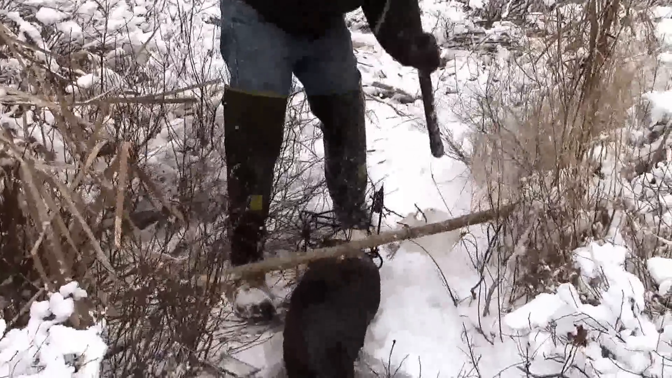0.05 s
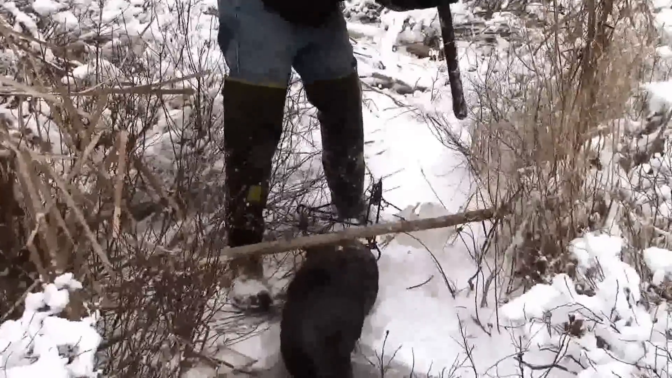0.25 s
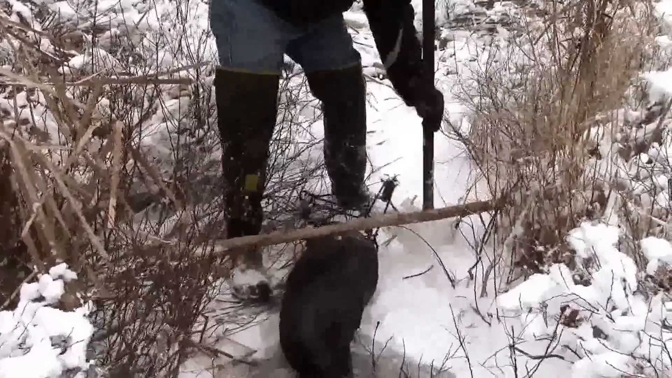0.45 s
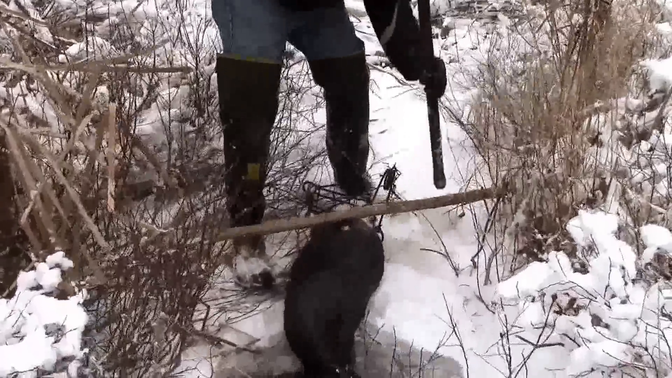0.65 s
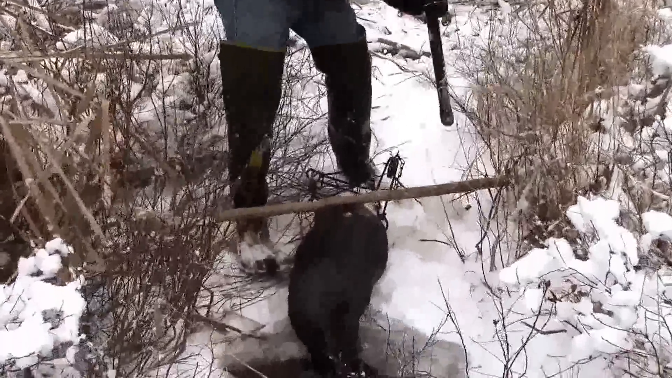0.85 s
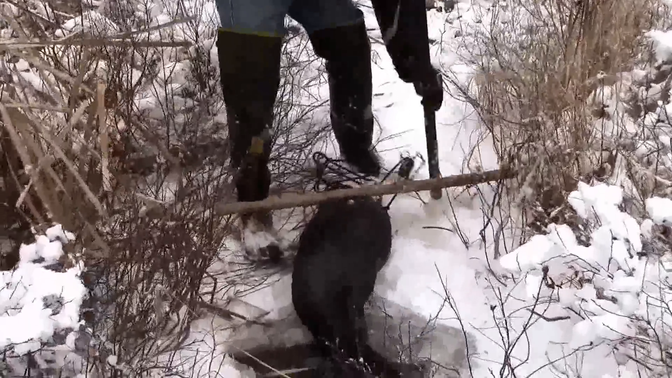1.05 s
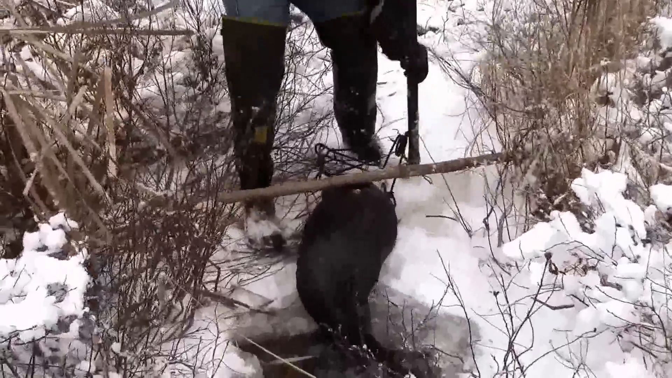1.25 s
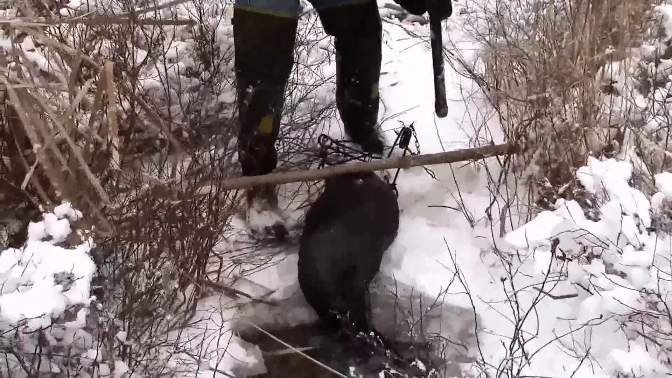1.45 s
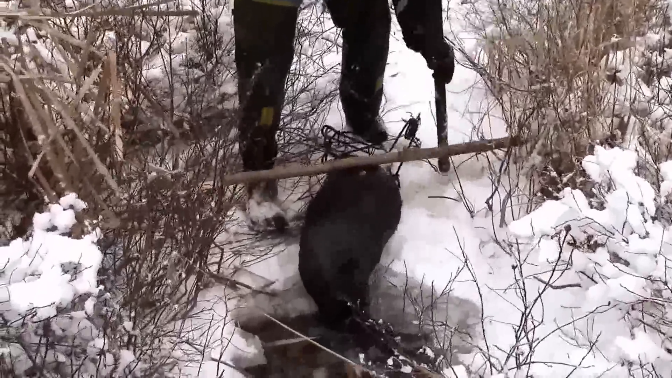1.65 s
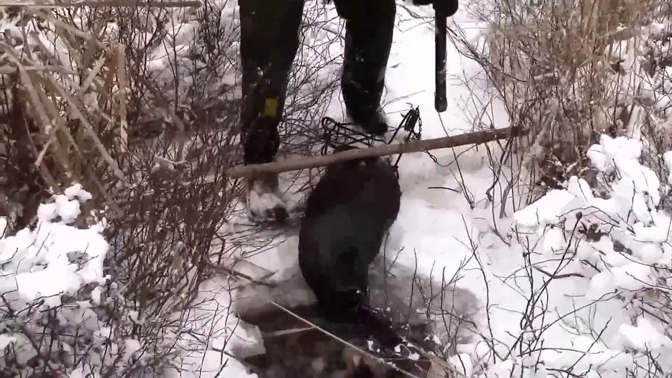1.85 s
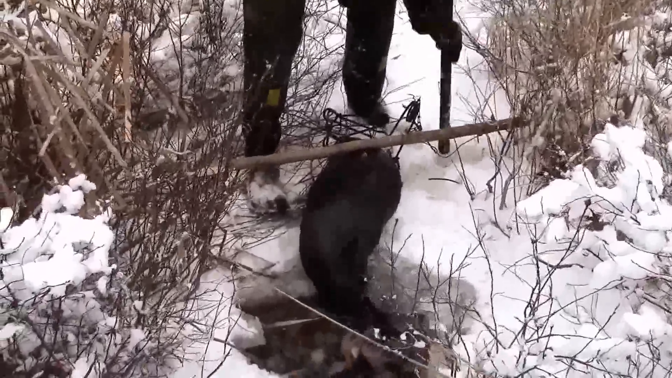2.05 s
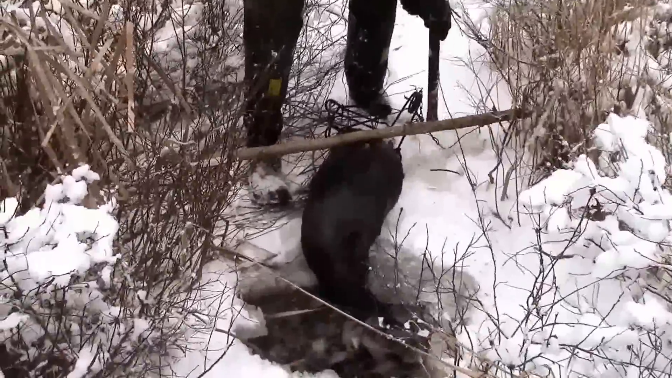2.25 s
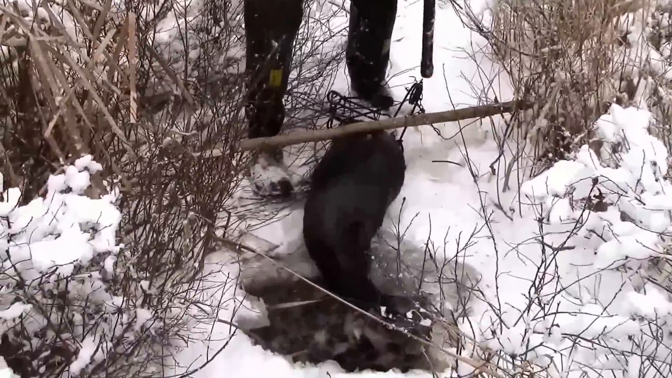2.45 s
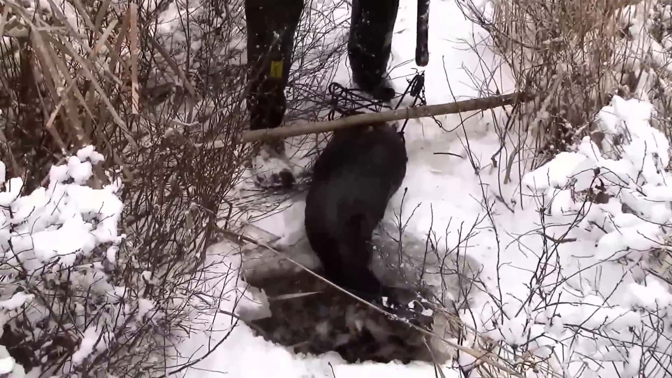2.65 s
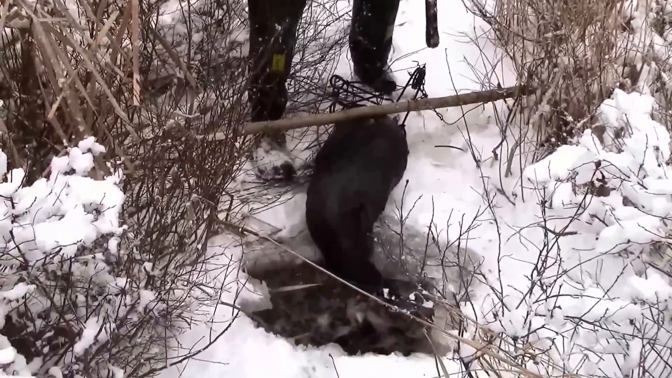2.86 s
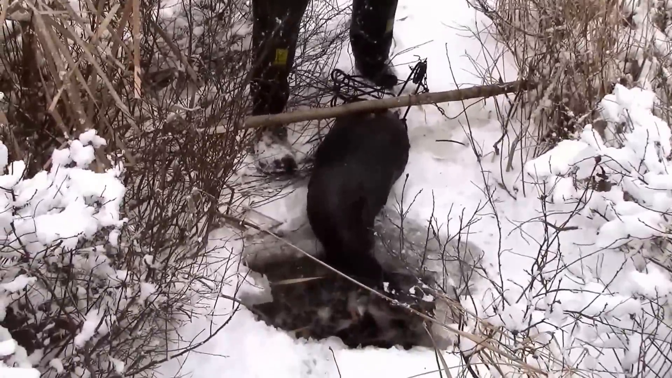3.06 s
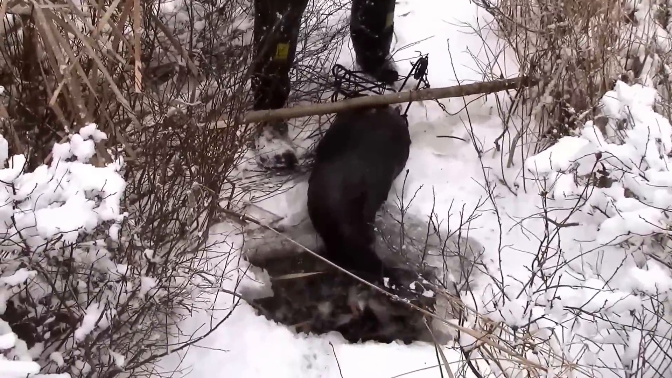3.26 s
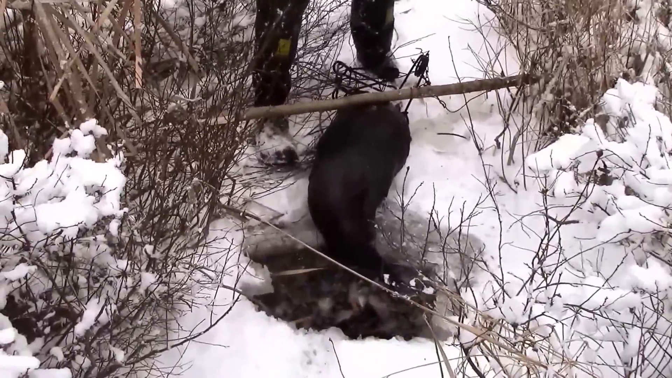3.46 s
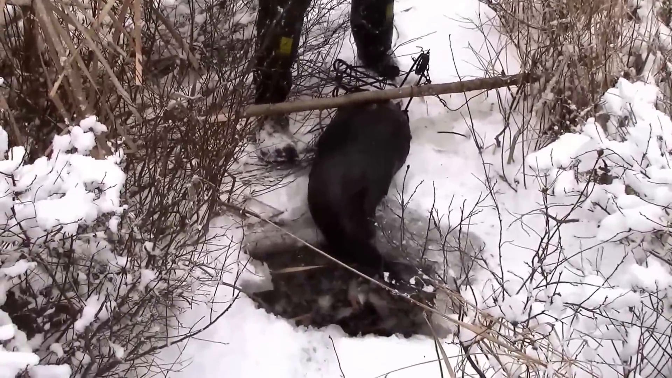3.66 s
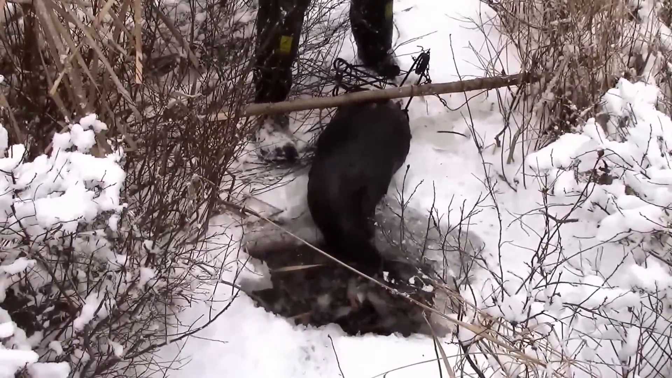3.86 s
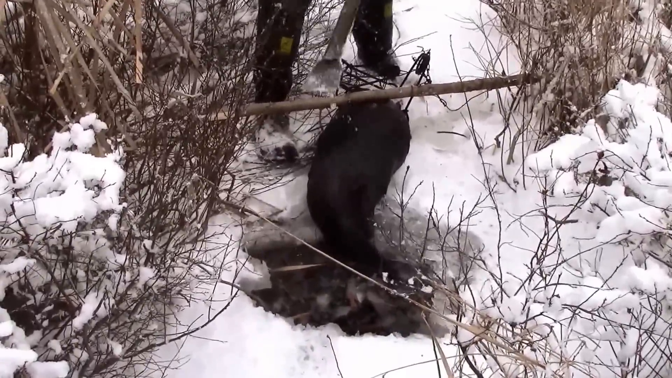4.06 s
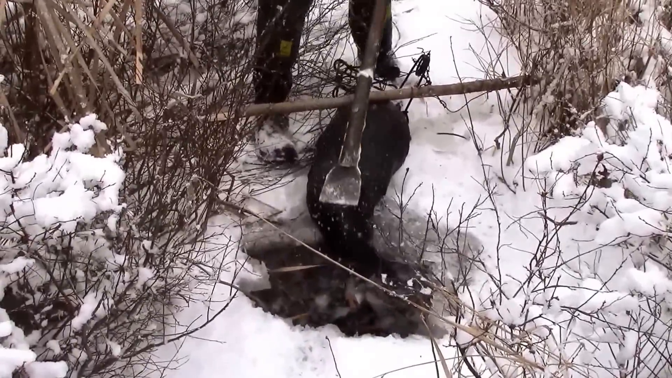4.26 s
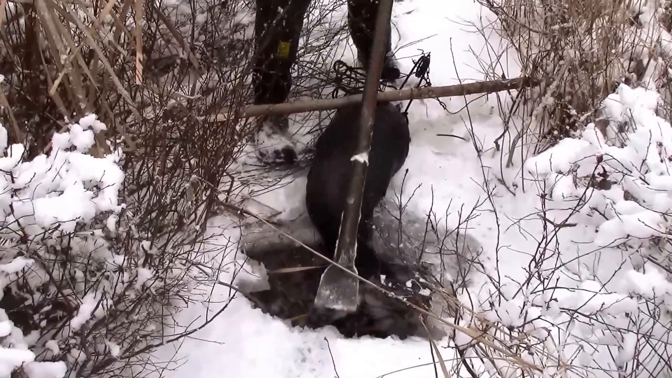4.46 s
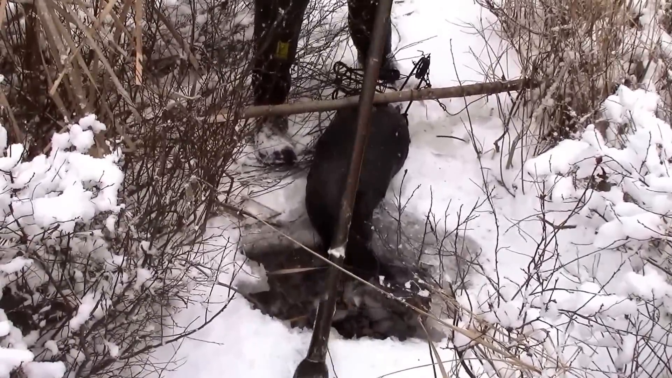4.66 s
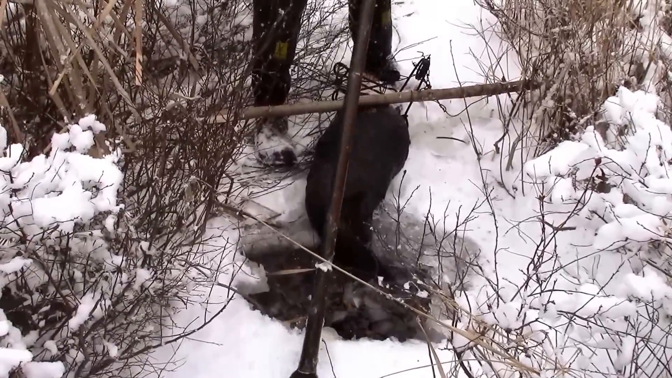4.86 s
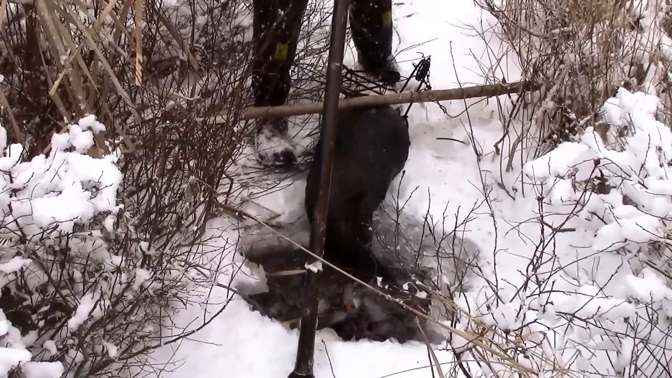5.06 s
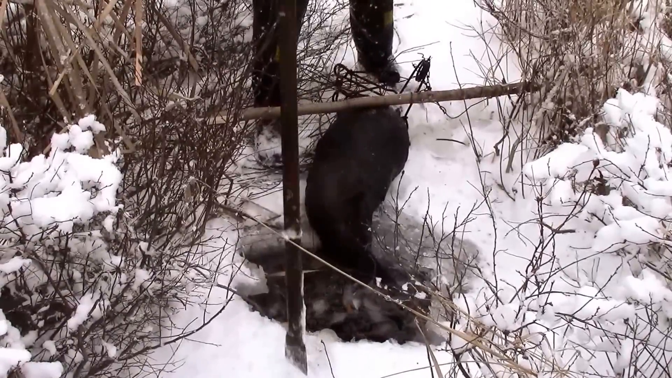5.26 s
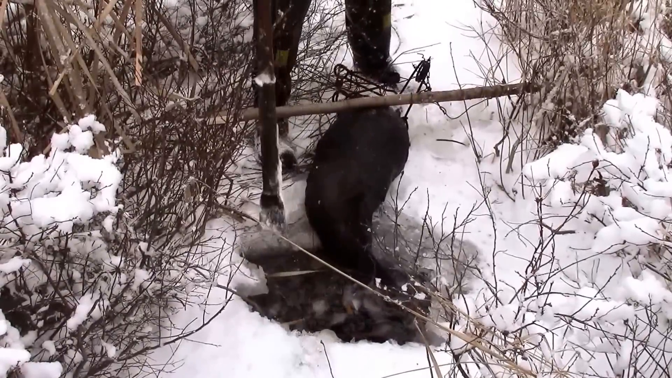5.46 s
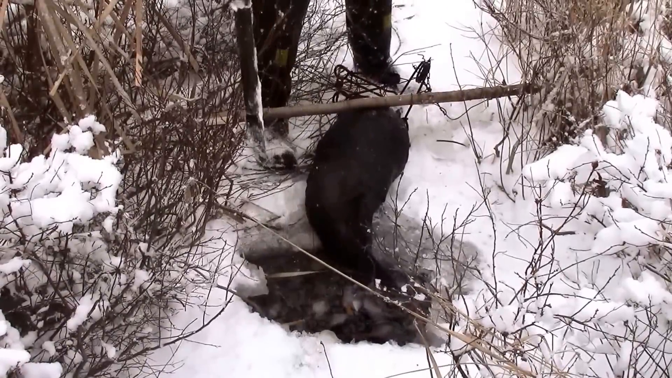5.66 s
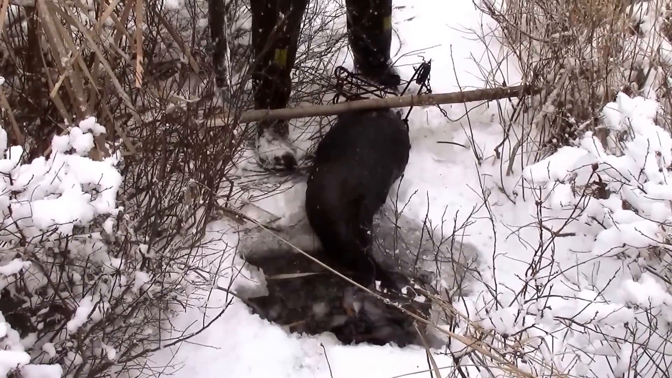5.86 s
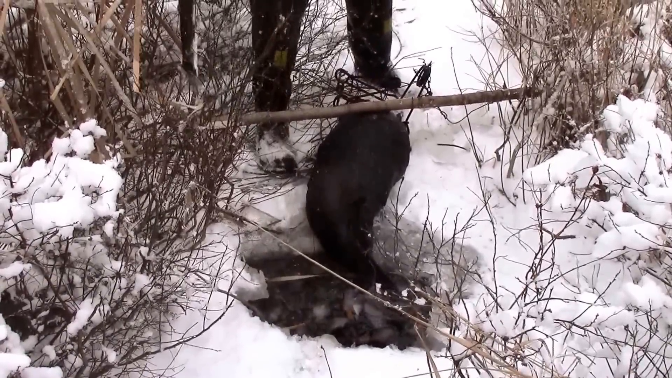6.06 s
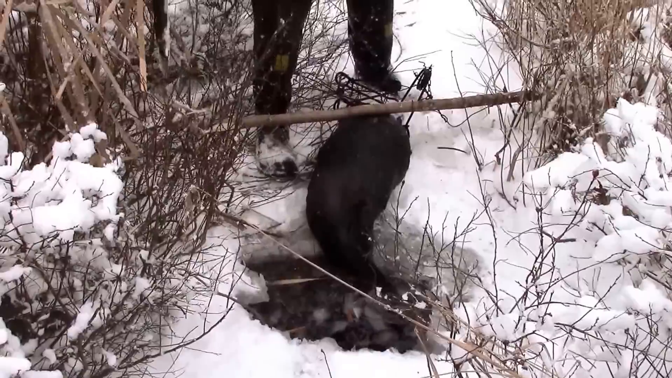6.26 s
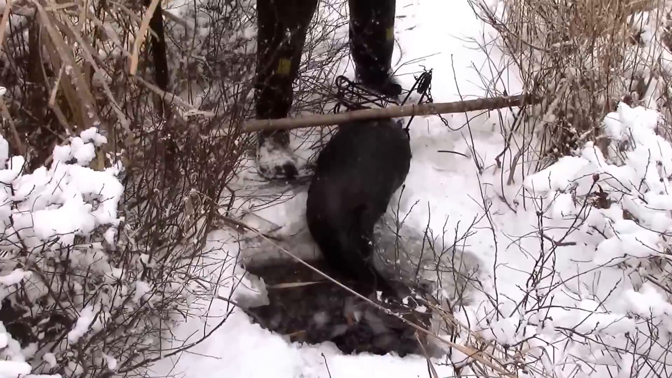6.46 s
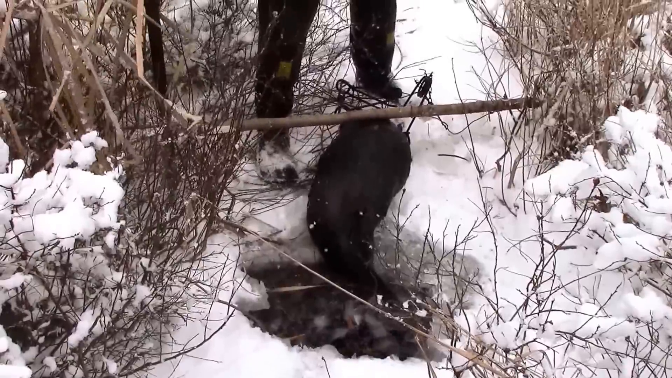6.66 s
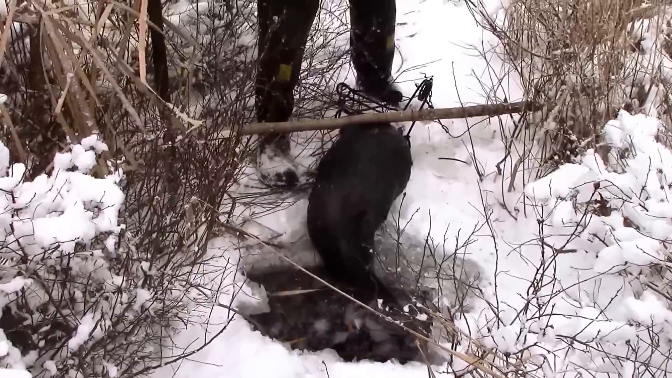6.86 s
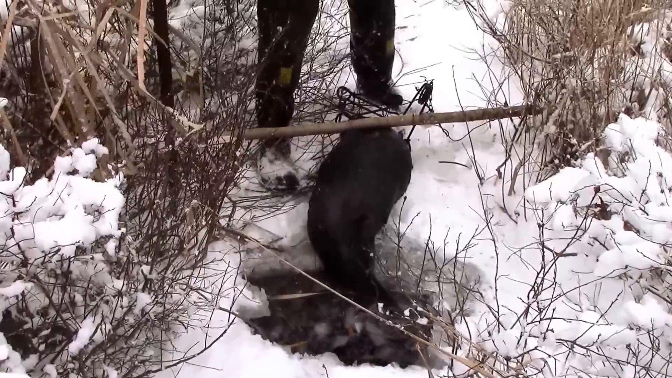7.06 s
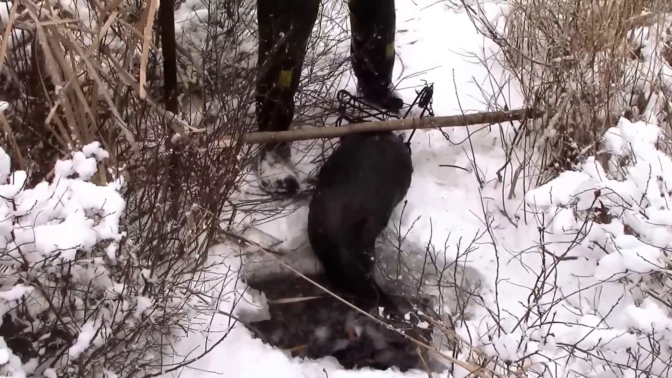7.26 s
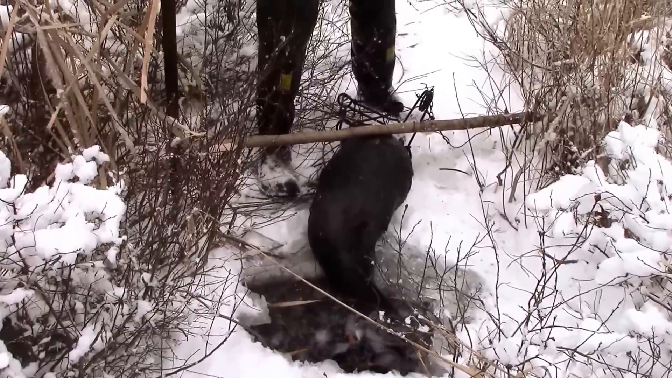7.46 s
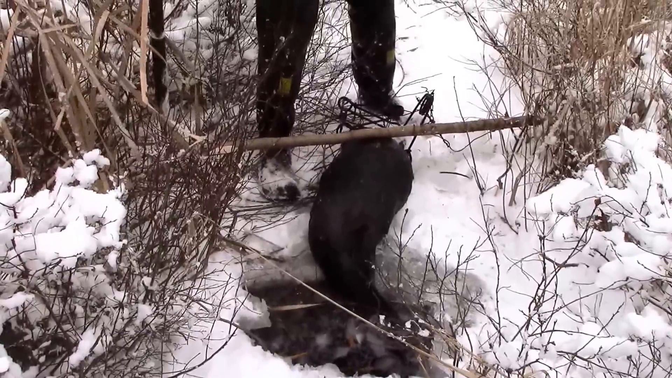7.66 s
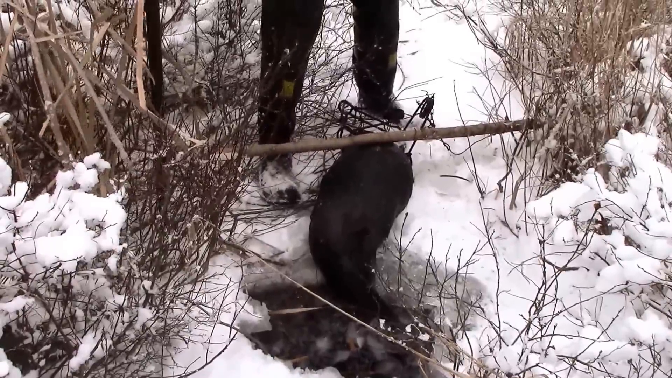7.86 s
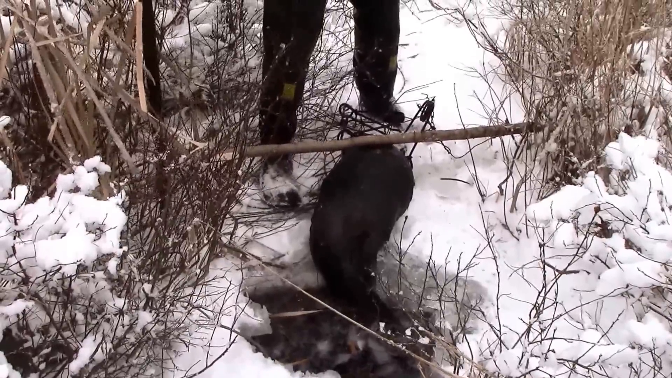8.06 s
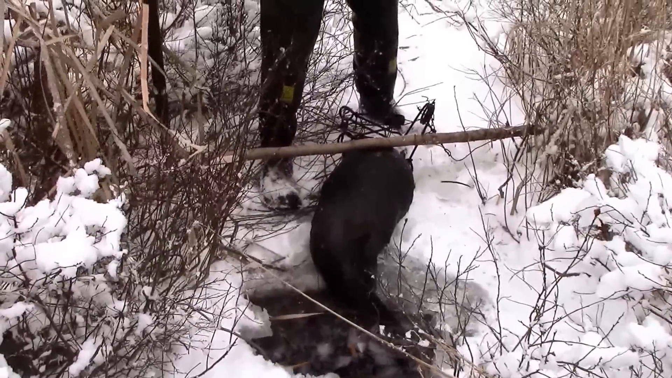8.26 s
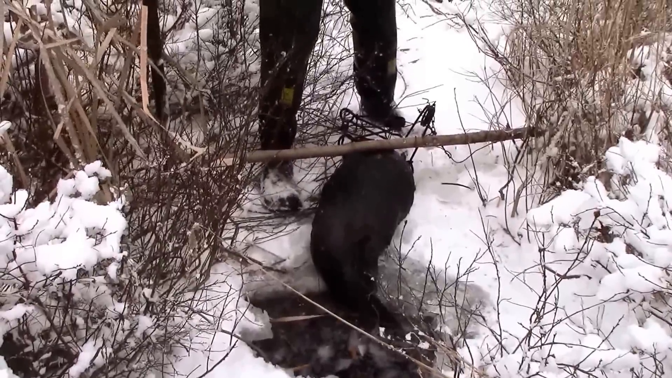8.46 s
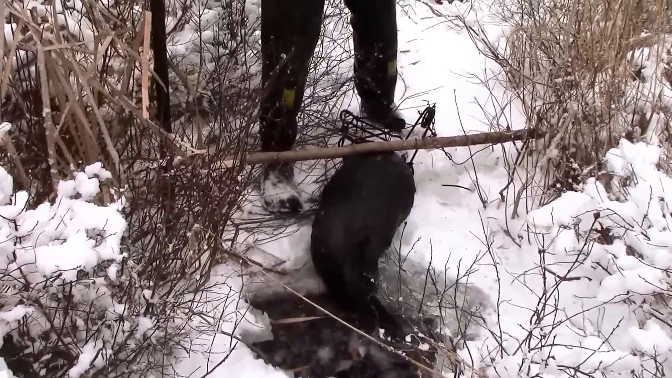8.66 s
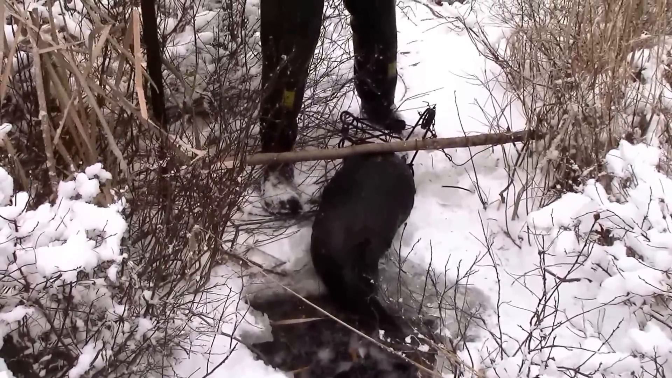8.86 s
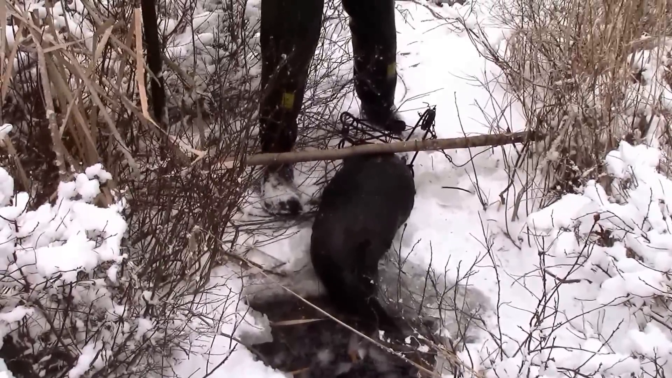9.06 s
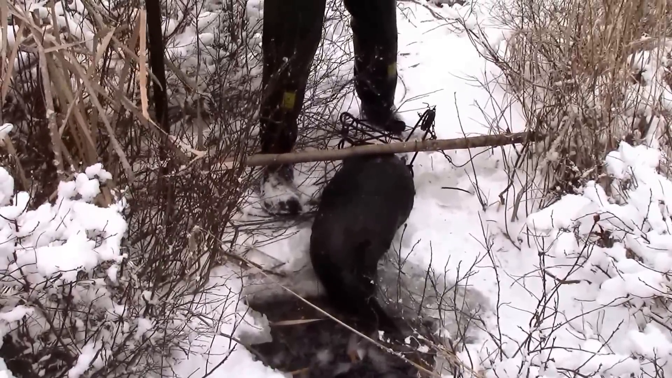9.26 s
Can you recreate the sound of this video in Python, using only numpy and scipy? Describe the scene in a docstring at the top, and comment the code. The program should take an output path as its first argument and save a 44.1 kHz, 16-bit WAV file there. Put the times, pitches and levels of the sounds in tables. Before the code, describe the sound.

A steel ice chisel strikes ice in widely spaced sharp, crunching blows, later ones cracking in quick snaps, with soft clothing rustle in snowy quiet.

```python
"""A steel ice chisel chops at the rim of a hole in a frozen pond, outdoors in snow: dense noise bursts
with a short steel ring. The first blows crush the ice; later ones split it in runs of fading snaps.
Crumbs fizz, the sheet heaves dully, chips tick and knock. Clothing, reeds and snow rustle as grainy
noise under slow swells; a thin squeak, a faint low hum and soft outdoor air complete the scene."""
import sys
import numpy as np
from scipy import signal
from scipy.fft import rfft, irfft
from scipy.io import wavfile
from scipy.ndimage import uniform_filter1d, minimum_filter1d

SR = 44100
rng = np.random.default_rng(int(sys.argv[2]) if len(sys.argv) > 2 else 0)


def persist_wave(psi):
    """Save psi, clipped to +-1, as 16-bit WAV."""
    counts = np.round(np.clip(psi, -1, 1) * 32767).astype(np.int16)
    wavfile.write(sys.argv[1], SR, np.atleast_2d(counts).T)


N = 411012
TIME = np.arange(N) / SR

# Still air. Each row: frequency in Hz, relative level in dB.
AIR_SPECTRUM = [(25, -1), (70, 1.5), (180, 3), (400, 1.5), (750, 3), (1500, -20), (3000, -0.5), (6000, -25),
                (9000, -25.5), (13000, -32.5), (16000, -26)]
# Murmur of the open land. Each row: time in seconds, level in dB.
MURMUR_LEVEL = [(0, -66), (2, -63.5), (3.3, -67), (4.3, -65), (5.3, -65), (5.7, -69), (7.3, -66.5),
                (9.3, -66)]
# Colour of the murmur. Each row: frequency in Hz, relative level in dB.
LAND_SPECTRUM = [(30, -24), (140, -22), (300, -6), (600, -2), (1100, -3.5), (2200, -6.5), (5000, -11),
                 (16000, -43.5)]

# Soft background stir of clothing, rising and falling. Each row: time in seconds, relative level in dB.
STIR_LEVEL = [(0, -59), (1.6, -57), (2.2, -66), (2.6, -69), (3.7, -89), (4.85, -56), (5.15, -75.5),
              (6.1, -65), (7.2, -59.5), (9.3, -66.5)]
# Sweeps of sleeve, reeds or blade; each mixes hiss with its own share of gritty body.
# Each row: peak time in seconds, relative level in dB, rise in seconds, fall in seconds,
# body against hiss in dB.
SWEEPS = [(.02, -48, 0.041, 0.078, -6.5), (.19, -46, 0.16, 0.068, -7), (2.33, -61, 0.14, 0.048, -9),
          (3.03, -65, .13, 0.22, -20), (3.27, -47.5, 0.081, 0.1, -16), (3.44, -52, 0.088, 0.11, -14),
          (3.63, -55, 0.094, 0.048, -19), (3.999, -42.5, 0.11, 0.19, -12), (4.58, -53, 0.78, 0.13, -9),
          (5.01, -51.5, 0.058, 0.066, -8), (5.22, -57.5, 0.058, 0.18, -4), (5.8, -52.5, 0.011, 0.027, -8),
          (5.9, -58, 0.08, 0.025, -11), (6.21, -45.5, 0.037, 0.1, -7), (6.46, -31, 0.099, 0.076, -8),
          (7.4, -55, 0.017, 0.0087, -1), (7.54, -49.5, 0.055, 0.17, -8.5), (7.73, -49, 0.1, .03, -8),
          (7.88, -39.5, 0.053, 0.13, -10), (7.935, -36.5, 0.012, 0.018, -11), (8.39, -50, 0.22, 0.063, -13),
          (8.56, -45.5, 0.048, 0.15, -8.5), (9.02, -50, 0.072, 0.051, -17), (9.21, -44.5, 0.054, 0.17, -14)]
SWELL_EXPONENT = 2.34  # 1 = pointed, 2 = rounded
# Fine debris falls after a blow. Each row: blow time in seconds, relative level in dB, T60 in seconds.
DEBRIS_SHOWERS = [(.497, -38, 1.4), (1.101, -40, 0.63), (1.622, -45.5, 0.77), (6.485, -43.5, 1.39),
                  (7.94, -48, 1.9), (8.628, -55.5, 5.7)]
SHOWER_FLIGHT_S, SHOWER_BODY_DB = 0.071, -9
# Hiss of the rustle. Each row: frequency in Hz, relative level in dB.
HISS_SPECTRUM = [(40, -46), (300, -30.5), (900, -22.5), (2000, -3.5), (3200, 2), (5000, -2.5), (7000, 1.5),
                 (9500, 0.5), (12000, -4.5), (14500, -14), (16000, -24.5)]
# Resonances of rubbing cloth. Each row: centre in Hz, width in Hz, height in dB.
CLOTH_RESONANCES = [(3060, 370, 0), (3600, 130, 2), (4750, 71, 0), (5970, 1400, 3), (8130, 810, 0),
                    (10600, 1600, 1.5)]
# Gritty body of the rustle. Each row: frequency in Hz, relative level in dB.
GRIT_SPECTRUM = [(40, -40), (250, -42), (600, -5.5), (1200, 0.5), (2200, 4), (3200, 1), (5000, -14.5),
                 (16000, -29.5)]

# Faint low hum. Each row: frequency in Hz, level in dB, peak time in seconds, fade in seconds.
HUM_PARTIALS = [(47, -82, .2, 0.54), (96.9, -76, .05, .4), (142, -77.5, .7, .6)]

# Snow yields as weight shifts. Each row: peak time in seconds, level in dB, half length in seconds.
SNOW_STEPS = [(.09, -57.5, 0.15), (0.323, -56, 0.032), (0.467, -54, 0.033), (.72, -59, 0.29),
              (1.045, -52.5, 0.034), (1.236, -58, 0.22), (1.66, -55.5, .14), (2.367, -60.5, 0.1),
              (4.6, -57.5, 0.096), (5.046, -63.5, 0.067), (6.196, -64, 0.065), (6.426, -53, 0.1),
              (7.903, -61, 0.037), (9.3, -59, 0.091)]
# Colour of yielding snow. Each row: frequency in Hz, relative level in dB.
SNOW_SPECTRUM = [(30, -40), (140, -22), (300, -4), (600, 1.5), (1100, 2.5), (2200, -5), (5000, -7.5),
                 (16000, -39.5)]

# Larger chips land, twigs tick. Each row: start in seconds, level in dB, centre in Hz.
CHIP_TICKS = [(0.0606, -43, 1700), (.111, -43.5, 6240), (.2185, -47, 2980), (0.5687, -25, 7700),
              (0.6242, -29, 2370), (1.2205, -32, 2150), (1.375, -44.5, 6300), (1.6966, -32.5, 1960),
              (1.7094, -36.5, 7100), (1.913, -48, 3000), (1.949, -48.5, 1820), (2.4693, -52, 2300),
              (2.7624, -55, 2920), (4.3697, -47, 7300), (6.138, -43.5, 6100), (6.315, -38, 7100),
              (6.8447, -43.5, 3000), (6.8936, -42.5, 6900), (7.0248, -44, 3020), (7.0893, -47.5, 3600),
              (8.2083, -40, 5700), (8.542, -42.5, 2650), (9.172, -41, 2380)]
# Loose ice knocks or clicks. Each row: centre time in seconds, peak in dB, pitch in Hz,
# decay length in seconds.
ICE_KNOCKS = [(0.4962, -26, 596, 0.0019), (1.013, -26.5, 606, 0.00039), (1.017, -20.5, 667, 0.00077),
              (1.6227, -20, 714, 0.0012), (1.646, -7.5, 810, 0.00059), (1.8494, -24.5, 724, 0.0009),
              (1.855, -47.5, 252, 0.0037), (2.607, -12, 2390, 0.00006), (5.277, -52, 203, 0.0043),
              (6.531, -23.5, 1410, 0.00039)]

# Cracks run in jumps. Each row: start in seconds, level in dB, number of jumps,
# mean gap in seconds.
CRACK_RUNS = [(.4965, -23.5, 1, 0), (0.52, -30, 1, 0), (1.622, -18.5, 1, 0), (2.1202, -23, 3, 0.013),
              (2.16, -29.5, 2, 0.017), (4.762, -36, 1, 0), (5.2305, -39, 1, 0), (6.483, -15, 1, 0),
              (6.4958, -15.5, 3, 0.0087), (7.948, -19, 10, 0.0091), (8.636, -18.5, 7, .0096),
              (9.269, -19, 7, 0.011)]
CRACK_FADE_DB = 15  # from the first jump to the end of a run
JUMP_JITTER_GAPS, JUMP_SPREAD_DB = .16, 2  # standard deviations
# Brittle snap. Each row: frequency in Hz, relative level in dB.
SNAP_SPECTRUM = [(50, -32), (300, -17), (900, 0), (1800, 1.5), (4300, 6.5), (5600, 2.5), (6600, -7),
                 (10500, -8.5), (13000, -16), (16000, -96)]
# Resonances of the ice sheet. Each row: centre in Hz, width in Hz, height in dB.
SHEET_RESONANCES = [(1260, 200, 4), (1740, 130, 4), (2250, 300, 4.5), (3270, 300, 2), (3900, 700, 2),
                    (4950, 400, 2)]

# Blade bites. Each row: peak time in seconds, level in dB, rise in seconds, T60 in seconds,
# bass shelf in dB, tilt in dB per octave, steel ring against the bite in dB.
BLADE_BLOWS = [(.4967, -17, .0012, 0.01, 9, -1, -15), (1.1008, -14.5, 0.0017, 0.04, -4.5, -1, -30),
               (1.6222, -13.5, 0.0013, 0.028, 7.5, 1.5, -25), (2.12, -13, 0.0021, 0.064, -4, -2, -7),
               (2.1582, -37.5, .004, 0.068, 3, -0.5, 8), (4.7656, -26, 0.0019, 0.049, 6, 0.5, -31),
               (5.23, -45, 0.0013, 0.018, 5, 1, 0), (6.485, -17.5, 0.0019, 0.04, -7, -.5, -2.5),
               (7.94, -10, 0.0013, 0.043, -2, .5, -18), (8.6283, -12, 0.0022, 0.028, 3.5, -.5, -26),
               (9.2506, -17.5, 0.0031, 0.05, -12.5, -3.5, -14)]
# Colour of the bite. Each row: frequency in Hz, relative level in dB.
BITE_SPECTRUM = [(30, -25), (130, -34), (250, -14.5), (450, -8.5), (900, 0), (1800, 2.5), (2800, 1),
                 (4300, -13.5), (5600, -10), (9000, -16.5), (12000, -21), (16000, -30)]
# Modes of the chisel. Each row: nominal frequency in Hz, nominal level in dB, T60 in seconds.
STEEL_MODES = [(1725, -3, .08), (2476, -15, .07), (3340, -9, .06), (4270, -2, .08), (4880, -2, .055),
               (5740, -16, .06), (8360, -18, .09)]

# The sheet heaves and rocks back. Each row: peak time in seconds, push in dB, push T60 in seconds,
# rebound in dB.
SHEET_HEAVES = [(.498, -40, .25, -47), (1.103, -47, 0.19, -48), (1.647, -24, 0.046, -56),
                (2.125, -33, 0.12, -49), (6.489, -39.5, 0.26, -54), (7.951, -31.5, 0.17, -39),
                (8.635, -34.5, 0.15, -45), (9.253, -34.5, 0.2, -44)]
REBOUND_DELAY_S, REBOUND_T60_S = 0.031, 0.17
# Colour of the heave. Each row: frequency in Hz, relative level in dB.
HEAVE_SPECTRUM = [(25, -21), (100, -30), (170, -16.5), (380, -3.5), (700, -6.5), (1200, -7), (3000, -21),
                  (16000, -57.5)]

# Ice is crushed, then sprays out. Each row: crush peak in seconds, crush level in dB,
# crush tilt in dB per octave, spray lag in seconds, spray level in dB, spray T60 in seconds,
# spray tilt in dB per octave.
ICE_CRUNCHES = [(0.5, -20.5, -5.5, 0.066, -28.5, 0.09, -2.5), (1.105, -21.5, 1.5, .029, -25, 0.18, -6),
                (1.625, -25, 4, 0.016, -24, 0.13, -4), (2.122, -31.5, 0, 0.018, -28.5, 0.028, -2),
                (2.378, -41.5, -7.5, 0.024, -54, 0.16, -10), (4.752, -46, -0.5, .014, -30, 0.082, -6.5),
                (5.225, -47, -11, 0.021, -43, .075, -4), (6.44, -49, 2, .042, -21, 0.044, -1.5),
                (7.938, -26.5, -4.5, 0.065, -35, 0.11, -6.5), (8.611, -33, -3.5, 0.023, -27.5, 0.12, -6),
                (9.244, -29, -9.5, 0.015, -33.5, 0.21, -9.5)]
CRUSH_RISE_S, CRUSH_T60_S = .0015, 0.091
SPRAY_RISE_SHARE = 0.43  # rise as a share of the lag
# Colour of the crumbs. Each row: frequency in Hz, relative level in dB.
CRUMB_SPECTRUM = [(40, -80), (200, -46.5), (500, -14.5), (1500, -4.5), (3300, -1), (5500, -4), (9000, 4.5),
                  (11500, -2.5), (14000, -11.5), (16000, -25.5)]

# Thin high squeak. Each row: peak time in seconds, level before flutter in dB, half length in seconds.
SQUEAK_CHIRPS = [(5.13, -62, .016), (5.33, -70, 0.15), (5.72, -78.5, 0.23), (5.895, -57, 0.03)]

# Likeness of the channels for near sounds. Each row: frequency in Hz, likeness from 0 to 1.
NEAR_LIKENESS = [(60, .93), (300, .975), (1200, .975), (2800, .94), (5500, .86), (10000, .74), (16000, .74)]
# Likeness of the channels for the surroundings. Each row: frequency in Hz, likeness from 0 to 1.
DIFFUSE_LIKENESS = [(60, .05), (400, .1), (1000, .25), (2400, .3), (6000, .55), (15000, .6)]
# Channel balance. Each row: frequency in Hz, left minus right in dB.
CHANNEL_BALANCE = [(100, -1), (700, -1.4), (2500, -.3), (6000, .6), (14000, 1.3)]
# Place of the near sounds. Each row: time in seconds, left minus right in dB.
WORK_PLACE = [(0, -.3), (2.3, -.6), (5, -.3), (6.5, .8), (8, .2), (9.3, .3)]
BAND_EDGE_HZ = 15900


def amp(db):
    """Decibels to gain."""
    return 10 ** (np.asarray(db) / 20)


def unit(x):
    """Scales to rms 1."""
    return x / np.sqrt(np.mean(x ** 2) + 1e-20)


def row_norms(x):
    """Root energy of each row."""
    return np.linalg.norm(x, axis=1, keepdims=True)


def at_hz(points, hz):
    """Reads a spectrum on a log-frequency axis."""
    f, value = np.transpose(points)
    return np.interp(np.log(hz + 1), np.log(f), value)


def curve(points):
    """Reads a control curve at every sample."""
    return np.interp(TIME, *np.transpose(points))


def add(mix, start_s, sound):
    """Mixes a sound in at a time."""
    part = mix[..., max(0, round(start_s * SR)):][..., :sound.shape[-1]]
    part += sound[..., :part.shape[-1]]


def swell(peak_s, rise_s, fall_s):
    """Gain of one movement: grows to 1 at its peak and dies away."""
    distance = np.maximum((peak_s - TIME) / rise_s, (TIME - peak_s) / fall_s)
    return np.exp(-np.minimum(distance, 10) ** SWELL_EXPONENT)


def colour(x, points, peaks=(), tilt_db=0, bass_db=0, size=4096):
    """Causal minimum-phase filter of unit energy: spectrum, resonances, tilt and bass shelf."""
    hz = abs(np.fft.fftfreq(size, 1 / SR))
    db = at_hz(points, hz) + tilt_db * np.log2((hz + 500) / 3000) + bass_db / (1 + (hz / 1000) ** 4)
    for centre_hz, width_hz, height_db in peaks:
        db = db + height_db / (1 + (2 * (hz - centre_hz) / width_hz) ** 2)
    response = np.exp(signal.hilbert(np.log(amp(db))).conj())
    taps = np.fft.ifft(response).real[:size // 2]
    return signal.oaconvolve(x, taps[None] / np.linalg.norm(taps), axes=1)[:, :x.shape[1]]


def recolour(x, *shape, **slopes):
    """Colours a short sound and keeps the energy of each row."""
    y = colour(x, *shape, **slopes)
    return y * row_norms(x) / row_norms(y)


def shards(low_hz, high_hz, height_db, count):
    """Pieces of many sizes, each with its own resonance: rows of Hz, width in Hz, dB."""
    place, strength = rng.random((2, count))
    hz = low_hz * (high_hz / low_hz) ** ((np.arange(count) + place) / count)
    return np.transpose([hz, 90 + hz / 24, height_db * (.5 + strength)])


def grains(count, spread_db, grain_s):
    """Noise in tiny grains of uneven level; rows are the channels' common and differing parts."""
    steps = np.arange(count) / (SR * max(grain_s, 1 / SR))
    size_db = spread_db * np.minimum(rng.exponential(1, count), 5)
    return unit(rng.standard_normal((2, count)) * amp(size_db[steps.astype(int)]))


def burst(rise_s, t60_s, spread_db, grain_s):
    """Grains that swell and die away, with the energy of their envelope; returns lead in s and sound."""
    t = np.arange(-SR // 10, SR // 2) / SR
    rise = np.exp(-abs(np.minimum(t, 0) / rise_s) ** 1.5)
    shape = rise * amp(-60 * np.maximum(t, 0) / t60_s)
    sound = grains(len(t), spread_db, grain_s) * shape
    return -t[0], sound * np.linalg.norm(shape) / row_norms(sound)


def snap(t60_s, spike):
    """One brittle break: a pressure spike and a short scatter, rms 1 over its first 3 ms."""
    t = np.arange(SR // 20) / SR
    sound = rng.standard_normal((2, len(t))) * np.exp(-np.log(1000) * t / t60_s)
    sound /= row_norms(sound)
    sound[:, 0] += spike * rng.choice([-1, 1], 2)
    return sound / np.sqrt(np.mean(sound[:, :SR * 3 // 1000] ** 2, axis=1, keepdims=True))


def outdoors():
    """Still winter air as steady noise, and the murmur of the land as slowly varying grains."""
    air = amp(-84.5) * colour(rng.standard_normal((2, N)), AIR_SPECTRUM)
    murmur = colour(grains(N, spread_db=1.5, grain_s=0.0027), LAND_SPECTRUM)
    return air + amp(curve(MURMUR_LEVEL)) * murmur


def crumbs(count=170):
    """Single crumbs and stalks tick at random, each at its own pitch."""
    out = np.zeros((2, N))
    for when, pitch, size in rng.random((count, 3)):
        hz = 2200 * 4 ** pitch
        shape = [(hz / 10, -34), (hz * .5, -7), (hz, 0), (hz * 1.5, -7), (16000, -30)]
        tick = recolour(snap(t60_s=.02, spike=.6), shape, size=512)
        add(out, when * N / SR, amp(-5 + 9 * size ** 2) * tick)
    return out


def rustling():
    """Cloth, reeds and debris hiss in fine grains, with a gritty body of its own strength in each movement."""
    parts = [(amp(curve(STIR_LEVEL)), -9)]  # gain, body against hiss in dB
    for peak_s, db, rise_s, fall_s, body_db in SWEEPS:
        parts.append((amp(db) * swell(peak_s, rise_s, fall_s), body_db))
    for blow_s, db, t60_s in DEBRIS_SHOWERS:
        landing = np.clip((TIME - blow_s) / SHOWER_FLIGHT_S, 0, 1)
        since_s = np.maximum(TIME - blow_s - SHOWER_FLIGHT_S, 0)
        parts.append((landing * amp(db - 60 * since_s / t60_s), SHOWER_BODY_DB))
    # powers add
    hiss_gain = np.sqrt(sum(gain ** 2 for gain, _ in parts))
    body_gain = np.sqrt(sum((gain * amp(body_db)) ** 2 for gain, body_db in parts))
    cloth = colour(grains(N, spread_db=2.13, grain_s=0.00065), HISS_SPECTRUM, CLOTH_RESONANCES)
    grit = colour(grains(N, spread_db=2.0, grain_s=.002), GRIT_SPECTRUM)
    return hiss_gain * amp(-3.0) * cloth + body_gain * (grit + amp(7.5) * crumbs())


def shifting(x, patchy_db):
    """Random time-frequency gains: the rustle's colour wavers in small patches."""
    z = signal.stft(x, nperseg=512)[2]
    noise = rng.standard_normal(z.shape[1:])
    patches = unit(uniform_filter1d(uniform_filter1d(noise, size=5, axis=0), size=7, axis=1))
    y = signal.istft(z * amp(patchy_db * patches), nperseg=512)[1][:, :N]
    return y * np.linalg.norm(x) / np.linalg.norm(y)


def hum():
    """Low sine partials, each swelling and fading around its own peak time."""
    tone = np.zeros(N)
    for hz, db, peak_s, fade_s in HUM_PARTIALS:
        sine = np.sqrt(2) * np.sin(2 * np.pi * (hz * TIME + rng.random()))
        tone += amp(db) * swell(peak_s, fade_s, fade_s) * sine
    return np.array([tone, np.zeros(N)])


def footing():
    """Snow gives way under the boots in coarse, dull grains."""
    power = sum((amp(db) * swell(s, half_s, half_s)) ** 2 for s, db, half_s in SNOW_STEPS)
    return np.sqrt(power) * colour(grains(N, spread_db=2.5, grain_s=0.0041), SNOW_SPECTRUM)


def chips():
    """Small pieces tick around their own pitch; loose ice knocks as a brief sine pulse."""
    out, t = np.zeros((2, N)), np.arange(-SR // 40, SR // 40) / SR
    for start_s, db, hz in CHIP_TICKS:
        shape = [(hz / 16, -34), (hz / 3, -11), (hz, 0), (hz * 1.45, -4), (hz * 3, -21)]
        tick = snap(t60_s=.027, spike=.7)
        pieces = shards(hz * 0.83, hz * 1.59, height_db=4, count=3)
        add(out, start_s, amp(db) * recolour(tick, shape, pieces))
    for centre_s, db, hz, length_s in ICE_KNOCKS:
        knock = amp(db) * np.sin(2 * np.pi * hz * t) * np.exp(-abs(t / length_s) ** 0.96)
        add(out[0], centre_s + t[0], knock)
    return out


def cracking():
    """A crack advances in uneven, fading jumps, and each jump rings in the ice sheet."""
    out = np.zeros((2, N))
    for start_s, db, count, gap_s in CRACK_RUNS:
        for jump in range(round(count)):
            # the first jump comes at the start, at the run's own level
            early, strong = rng.standard_normal(2) * (jump > 0)
            crack = snap(t60_s=.024, spike=.7)
            gain = amp(db - CRACK_FADE_DB * jump / count + JUMP_SPREAD_DB * strong)
            peaks = [*SHEET_RESONANCES, *shards(952, 5560, height_db=5, count=5)]
            jump_s = start_s + gap_s * (jump - JUMP_JITTER_GAPS * early)
            add(out, jump_s, gain * recolour(crack, SNAP_SPECTRUM, peaks))
    return out


def chisel():
    """Dense fractures; the steel rings with slightly random mode pitches and strengths at each blow."""
    out, t = np.zeros((2, N)), np.arange(SR // 4) / SR
    for peak_s, db, rise_s, t60_s, bass_db, tilt_db, ring_db in BLADE_BLOWS:
        lead_s, bite = burst(rise_s, t60_s, spread_db=4.5, grain_s=0.00055)
        pieces = shards(487, 5000, height_db=2, count=7)
        add(out, peak_s - lead_s, amp(db) * recolour(bite, BITE_SPECTRUM, pieces, tilt_db, bass_db))
        for hz, mode_db, mode_t60_s in STEEL_MODES:
            detune, share, phase = rng.random(3)
            mode_hz = hz * (1 + 0.036 * (detune - .5))
            ring = amp(mode_db - 60 * t / mode_t60_s) * np.sin(2 * np.pi * (mode_hz * t + phase))
            add(out[0], peak_s, amp(db + ring_db) * (.5 + share) * ring)
    return out


def heaving():
    """The sheet is pushed dully into the water and rocks back: two dark noise bursts."""
    out = np.zeros((2, N))
    for push_s, push_db, push_t60_s, rebound_db in SHEET_HEAVES:
        push = (push_s, push_db, push_t60_s)
        rebound = (push_s + REBOUND_DELAY_S, rebound_db, REBOUND_T60_S)
        for peak_s, db, t60_s in (push, rebound):
            lead_s, thud = burst(.002, t60_s, spread_db=2.5, grain_s=.0025)
            add(out, peak_s - lead_s, amp(db) * recolour(thud, HEAVE_SPECTRUM))
    return out


def crumbling():
    """Ice is crushed at once under the blade; a moment later the crumbs fizz out."""
    out = np.zeros((2, N))
    for crush_s, crush_db, crush_tilt_db, lag_s, spray_db, spray_t60_s, spray_tilt_db in ICE_CRUNCHES:
        crush = (crush_s, crush_db, CRUSH_RISE_S, CRUSH_T60_S, crush_tilt_db)
        spray = (crush_s + lag_s, spray_db, SPRAY_RISE_SHARE * lag_s, spray_t60_s, spray_tilt_db)
        for peak_s, db, rise_s, t60_s, tilt_db in (crush, spray):
            lead_s, fizz = burst(rise_s, t60_s, spread_db=2.6, grain_s=.0012)
            pieces = shards(1000, 12000, height_db=3.5, count=10)
            add(out, peak_s - lead_s, amp(db) * recolour(fizz, CRUMB_SPECTRUM, pieces, tilt_db=tilt_db))
    return out


def scatter(x):
    """Reeds and brush return a short wash: convolution with decaying noise."""
    t = np.arange(SR // 2) / SR
    tail = rng.standard_normal((2, len(t))) * amp(-60 * t / 0.13) * (1 - np.exp(-t / 0.011))
    return signal.oaconvolve(x, tail / np.linalg.norm(tail[0]), axes=1)[:, :N]


def squeak(hz=9230, wander_hz=90, flutter_db=3):
    """A thin sine, unsteady in pitch and level."""
    wander, flutter = (unit(uniform_filter1d(z, SR // 200)) for z in rng.standard_normal((2, N)))
    level = sum(amp(db) * swell(s, half_s, half_s) for s, db, half_s in SQUEAK_CHIRPS)
    phase = 2 * np.pi * np.cumsum(hz + wander_hz * wander) / SR
    tone = level * amp(flutter_db * flutter) * np.sin(phase)
    return np.array([tone, np.zeros(N)])


def stereo(x, likeness):
    """Common part plus or minus differing part, weighted per frequency for the wanted likeness."""
    common, differing = rfft(x)
    hz, sides = np.fft.rfftfreq(N, 1 / SR), np.array([[1], [-1]])
    alike = np.clip(at_hz(likeness, hz), 0, 1)
    spread = common + sides * differing * np.sqrt((1 - alike) / (1 + alike))
    return irfft(spread * amp(sides * at_hz(CHANNEL_BALANCE, hz) / 2), N)


def scene():
    """The work is close and in front; the surroundings are diffuse."""
    work = chisel() + crumbling() + cracking() + heaving() + chips()
    moving = shifting(rustling(), patchy_db=1.9) + footing()
    near = work + amp(-32.0) * scatter(work) + moving + squeak() + hum()
    place_gain = amp(np.array([[1], [-1]]) * curve(WORK_PLACE) / 2)
    return stereo(near, NEAR_LIKENESS) * place_gain + stereo(outdoors(), DIFFUSE_LIKENESS)


def record(dry):
    """A fast look-ahead limiter holds the loudest peaks down; then a low-pass sets the band limit."""
    ceiling = .48
    allowed = ceiling / np.maximum(abs(dry).max(0), ceiling)
    gain = uniform_filter1d(minimum_filter1d(allowed, size=45), size=45)  # sizes in samples
    low_pass = signal.firwin(511, BAND_EDGE_HZ, window=("kaiser", 9), fs=SR)
    return signal.oaconvolve(dry * gain, low_pass[None], "same")


dry = scene()
out = record(dry)
persist_wave(out)
```